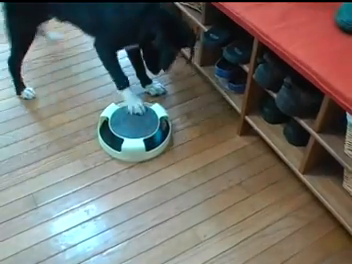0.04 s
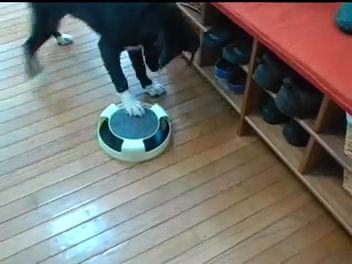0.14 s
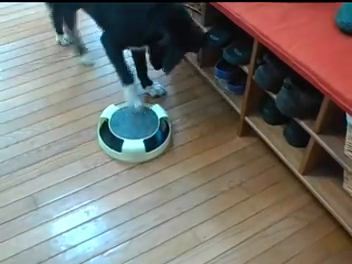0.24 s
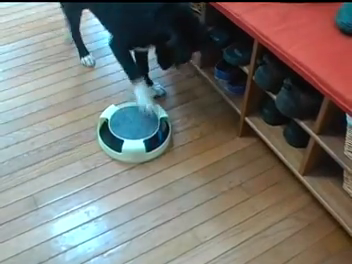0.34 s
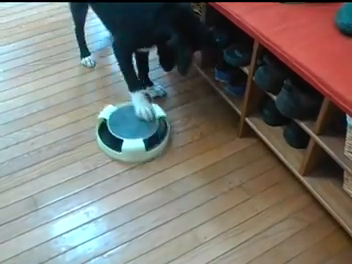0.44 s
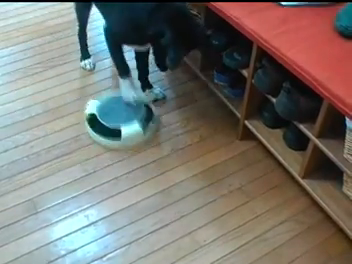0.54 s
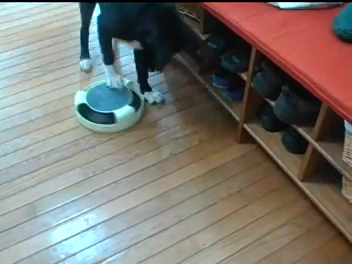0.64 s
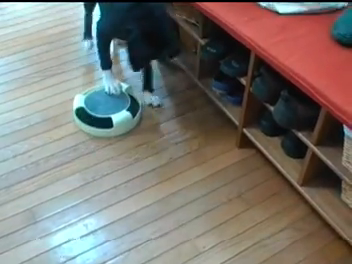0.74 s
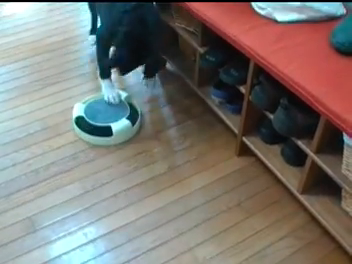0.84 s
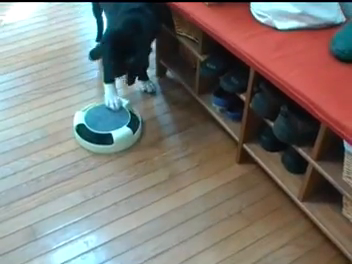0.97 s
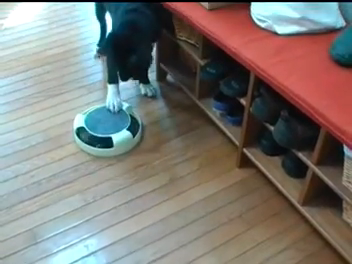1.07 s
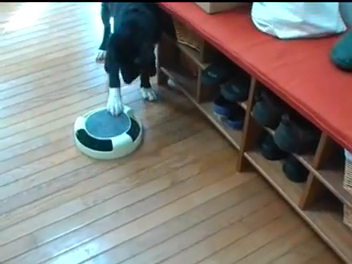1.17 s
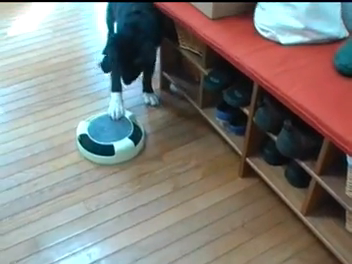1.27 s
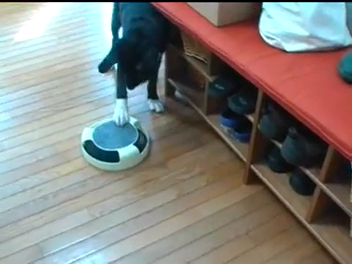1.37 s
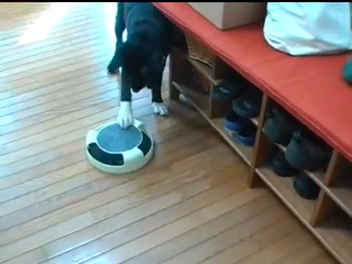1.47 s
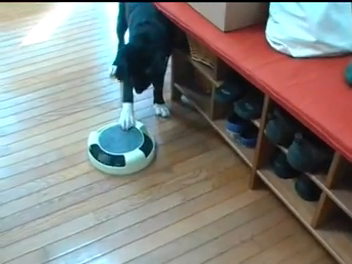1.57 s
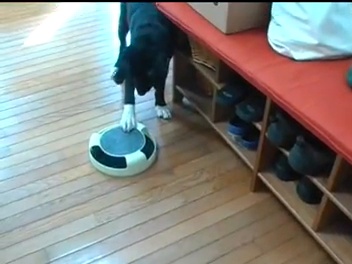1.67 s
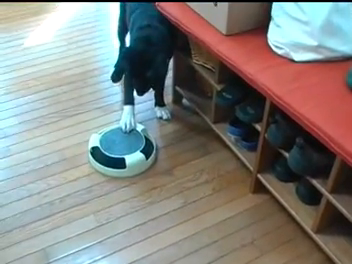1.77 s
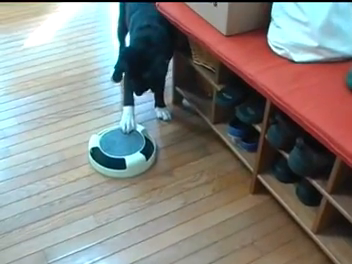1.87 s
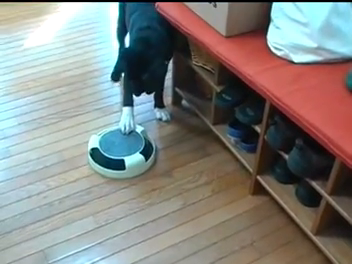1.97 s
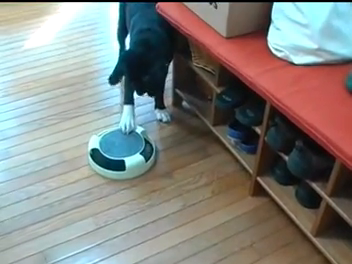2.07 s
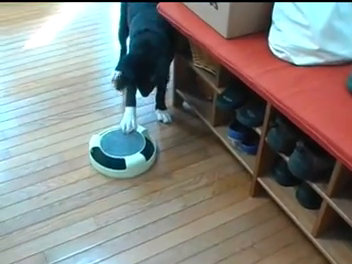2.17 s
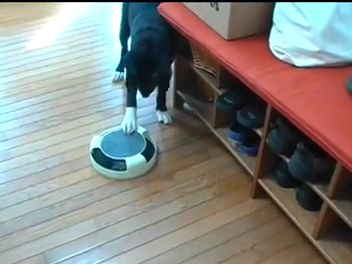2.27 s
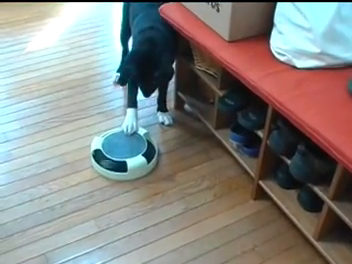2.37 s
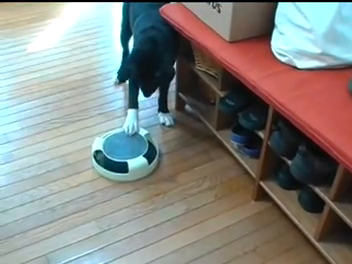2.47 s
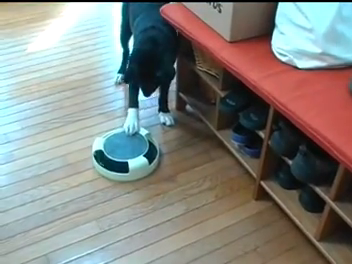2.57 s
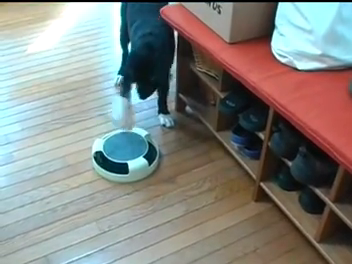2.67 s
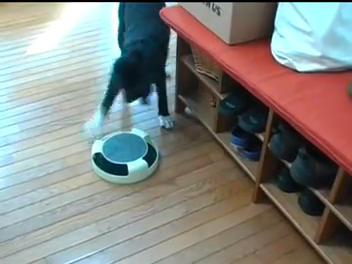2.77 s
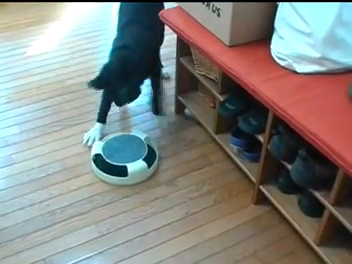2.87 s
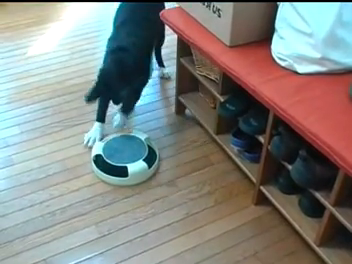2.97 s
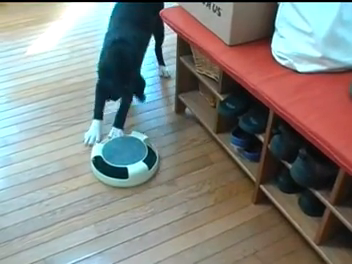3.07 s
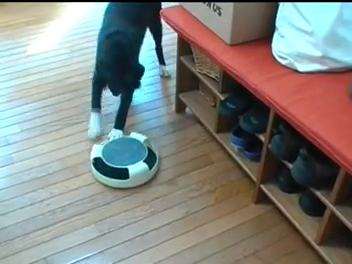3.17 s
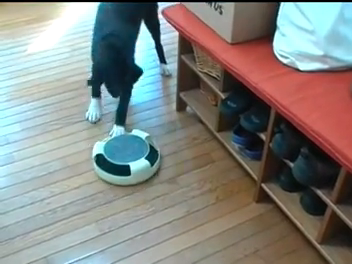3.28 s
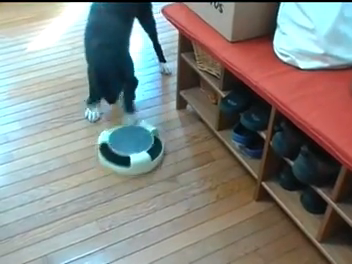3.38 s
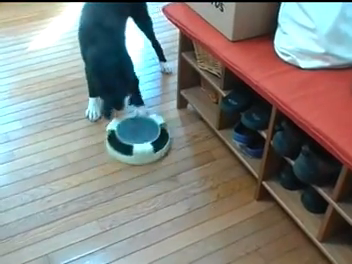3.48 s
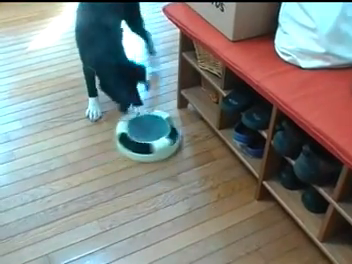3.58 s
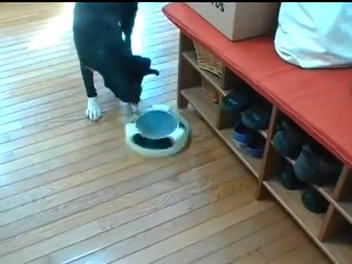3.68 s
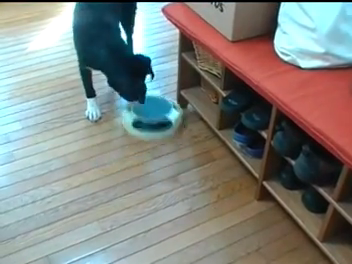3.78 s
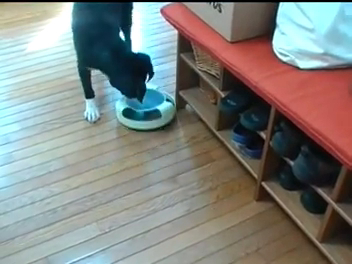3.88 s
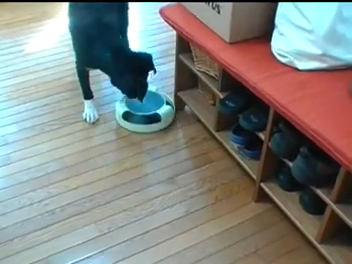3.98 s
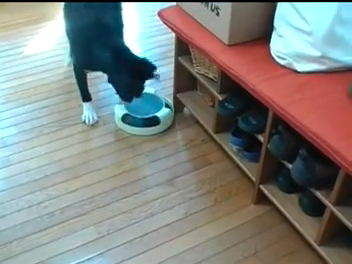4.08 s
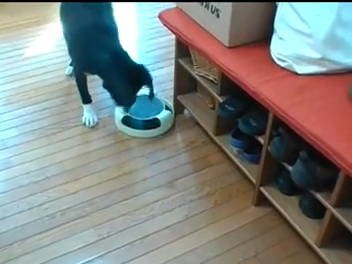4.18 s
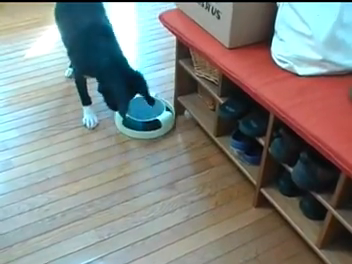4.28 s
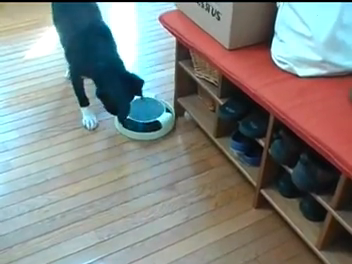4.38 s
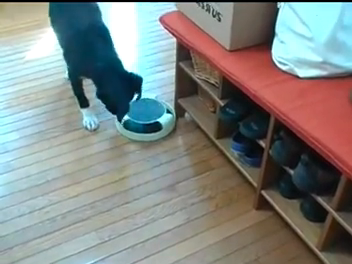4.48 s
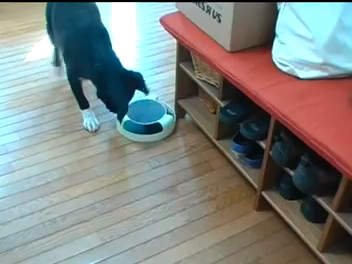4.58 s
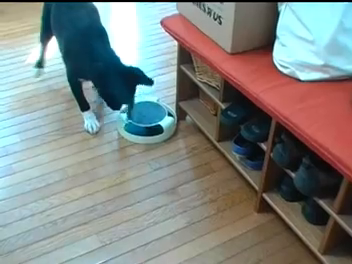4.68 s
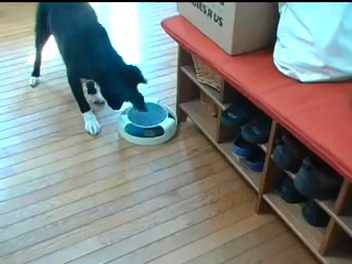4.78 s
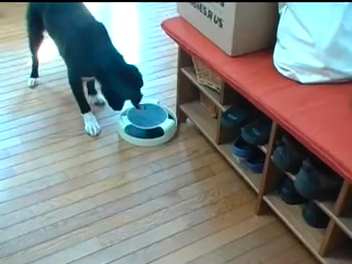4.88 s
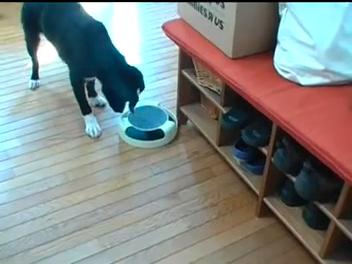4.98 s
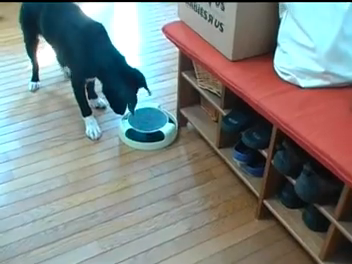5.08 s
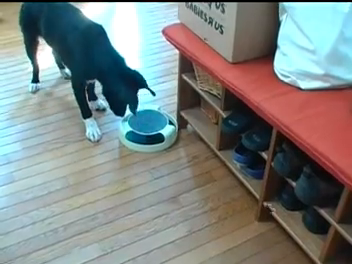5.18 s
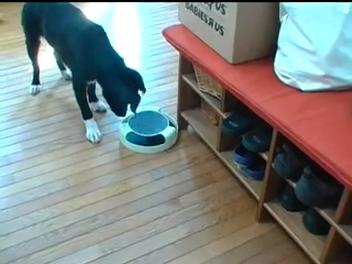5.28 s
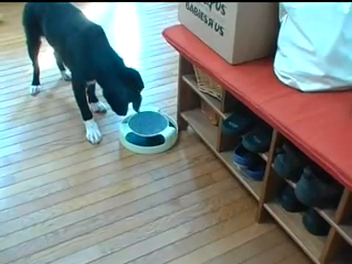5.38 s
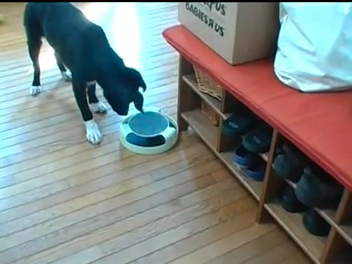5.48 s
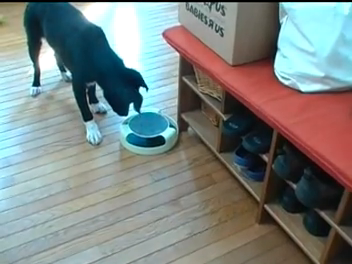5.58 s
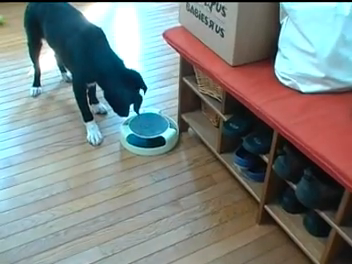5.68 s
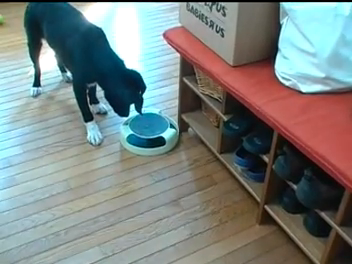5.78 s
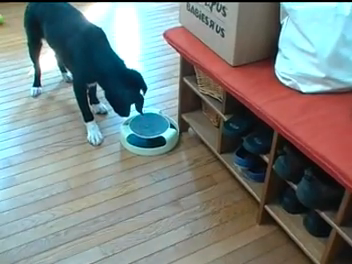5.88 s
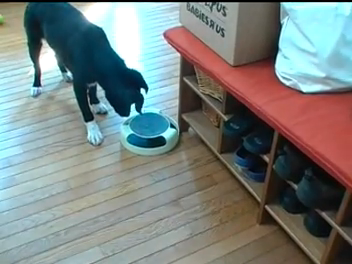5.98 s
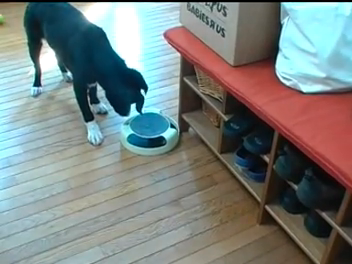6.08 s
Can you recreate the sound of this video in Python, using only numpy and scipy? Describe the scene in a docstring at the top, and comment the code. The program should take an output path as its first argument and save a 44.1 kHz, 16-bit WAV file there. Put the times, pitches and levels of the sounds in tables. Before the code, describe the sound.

A dog plays with a hollow plastic toy on a hardwood floor, heard from nearby in a quiet, fairly live room. Soft air noise and a faint low appliance hum run throughout. Right at the start a paw lands with a brief scrape. Around 0.5 seconds the toy skids and rocks on its rim with a hollow clatter, followed by claw ticks near 0.9 seconds. A lull follows, with two soft nudges at about 1.1 and 2.1 seconds. From 2.7 seconds paws tap the boards again, and the toy scrapes and knocks at 3.3 seconds. A swelling skid ends in a loud knock against a bench near 3.8 seconds. Claws and teeth click sharply on the shell with another knock around 4.3 seconds. The last faint ticks come near 4.7 seconds, leaving only the background until about 6 seconds.

```python
"""A dog paws and noses a round hollow plastic toy over hardwood in a quiet, fairly live room.
Faint appliance hum and air noise run throughout. First second: paws land on the boards, the toy skids
and rocks on its rim, claws and teeth tick on its shell. A lull follows, with two soft nudges.
From 2.7 s: more paws, then harder skids and knocks as the toy rocks and hits a shoe bench.
The last ticks come near 4.7 s and leave only the background."""
import sys
import numpy as np
from scipy import signal
from scipy.fft import rfft, irfft
from scipy.io import wavfile
from scipy.ndimage import uniform_filter1d

SR = 44100
rng = np.random.default_rng(int(sys.argv[2]) if len(sys.argv) > 2 else 0)


def wrap_up_sound(samples):
    """Save the sound to the file named by the first command line argument, as 16-bit audio."""
    columns = np.atleast_2d(samples).T
    # keep every value between -1 and 1, then stretch to whole-number steps
    tamed = np.clip(columns, -1, 1)
    steps = np.round(tamed * 32767).astype(np.int16)
    wavfile.write(sys.argv[1], SR, steps)


N = 270774
TIME_S = np.arange(N) / SR

# Paws landing. Each row: start in seconds, relative level in dB, weight (low bands) in dB,
# hardness (top band) in dB, ring of the touched spot in Hz, rattle decay in seconds.
PAW_FALLS = [(0.0615, -41.5, -4, 2.5, 1350, 0.0029), (0.231, -62.5, 7, -9, 700, 0.011),
             (2.7805, -42, 5, -13.5, 1330, 0.0045), (2.787, -63, 19, -17, 100, 0.0037),
             (2.9965, -44, -10, -9, 3600, 0.0022), (3.0085, -38.5, -4.5, -7.5, 3250, 0.003),
             (3.125, -48, -5, -13, 2000, 0.01)]
# Toy struck, tipping, dropping on its rim. Each row: as in PAW_FALLS.
TOY_KNOCKS = [(0.3645, -57, 11, -40, 870, 0.0022), (0.476, -36.5, -9, -31, 880, 0.0073),
              (0.54, -34.5, -21, -8, 2720, 0.015), (0.582, -37.5, -4, -1, 2070, 0.0069),
              (3.295, -38.5, -2, -10, 930, 0.0036), (3.338, -39, -4.5, -24, 920, 0.0016),
              (3.569, -59, 8.5, -14, 3200, 0.0092), (3.774, -32.5, 6, -7, 2500, 0.0038),
              (3.78, -48, 15.5, 7.5, 690, 0.0085), (3.795, -32.5, -5.5, -5.5, 1180, 0.00092),
              (3.906, -48.5, 10, -25, 1410, 0.0075), (4.3348, -33, -3.5, -6, 1240, 0.002),
              (4.344, -40.5, 0.5, -11, 425, 0.0034)]
# Claws and teeth on the shell. Each row: as in PAW_FALLS.
SHELL_TICKS = [(0.371, -59.5, -39, 1.5, 4500, 0.0022), (0.556, -39.5, -31, -11, 2980, 0.0025),
               (0.57, -46.5, -6, 0.5, 6300, .0011), (0.86, -48, -9.5, -7.5, 1520, 0.00084),
               (0.88, -49.5, -10, -2.5, 3280, 0.0063), (1.102, -68.5, 6, -10, 2830, 0.0014),
               (2.106, -62.5, 6, -0.5, 2900, .006), (4.2212, -36, -16, -9, 1590, 0.0027),
               (4.2395, -47, -4.5, -6, 3450, 0.0014), (4.2782, -41, -2, -1.5, 4770, 0.0014),
               (4.3155, -30.5, -8, -7.5, 3040, 0.0061), (4.673, -63, 4, 4.5, 1810, 0.00094),
               (4.688, -55.5, -6.5, -4, 4280, 0.012)]
# Bands of a contact. Each row: centre in Hz, width in Hz.
CONTACT_BANDS = [(220, 770), (800, 1690), (2800, 4370), (6500, 3100)]
# Pushes on the toy. Each row: start in seconds, length in seconds, relative starting level in dB,
# swell over the push in dB, treble lift in dB.
TOY_PUSHES = [(0.092, 0.13, -49, -7, -20), (0.423, 0.1, -45.5, -7, 0.5), (0.489, 0.11, -34.5, -7.5, 5),
              (1.062, 0.042, -60.5, -2, 5), (2.059, 0.054, -60, 1, 4), (2.69, 0.18, -65, -6, -10),
              (3.266, 0.17, -49, 3, 7.5), (3.572, 0.189, -53.5, 18, 6.5), (3.885, 0.26, -74, -15, -5),
              (4.259, 0.008, -43.5, 1, -10), (4.491, 0.013, -50.5, 4, -5)]
# Plastic rubbing on varnished wood. Each row: frequency in Hz, relative density in dB.
FRICTION_SPECTRUM = [(100, -27), (200, -23), (350, -7), (550, -5.5), (800, 3.5), (1500, 1.5), (3000, 1),
                     (6300, -9), (9000, -18), (13000, -32.5)]
# Steady air noise. Each row: frequency in Hz, relative density in dB.
AIR_SPECTRUM = [(25, -21), (70, -18.5), (110, -19), (150, -6.5), (180, -9.5), (260, -4), (410, -3.5),
                (625, -6), (1000, -10), (2000, -16), (3600, -20.5), (7000, -23.5), (11400, -27),
                (12200, -33), (12700, -57)]
# Floorboard modes. Each row: frequency in Hz, width in Hz, gain over the plain contact in dB.
BOARD_MODES = [(126, 65, 15), (273, 110, 6), (363, 11, -6)]
# Modes of the toy's shell. Each row: as in BOARD_MODES.
SHELL_MODES = [(124.4, 17.5, 10), (220, 7, -7), (363, 20, -2), (649, 15, 1.5), (840, 17, -14),
               (1184, 14, -1), (1460, 50, -16), (1702, 6.9, 7), (1943, 43, -14), (2603, 34, 0),
               (3370, 920, -5), (4700, 18, -27), (6350, 180, -16)]
# First reflections off bench and walls. Each row: delay in seconds, gain in dB.
EARLY_ECHOES = [(0.0097, -20), (0.0183, -22.5)]
# Room tail. Each row: frequency in Hz, level over direct in dB, T60 in seconds, side over mid in dB.
ROOM_TAIL = [(70, -11.5, 0.3, -33), (144, -7.5, 0.42, -39), (378, 5.5, 0.48, -35), (800, -5.5, 0.53, -49),
             (2000, -2.5, 0.42, -15.5), (4000, -4, 0.44, -13.5), (7160, -3, 0.44, -14),
             (12500, 3, 0.27, -6.5)]


def from_db(db):
    return 10 ** (np.asarray(db) / 20)


def unit_rms(x):
    return x / np.sqrt(np.mean(x ** 2) + 1e-20)


def bins_hz(size):
    return np.fft.rfftfreq(size, 1 / SR)


def at_hz(table, hz, column=1):
    """One table column, interpolated over log frequency."""
    table = np.array(table)
    return np.interp(np.log(np.maximum(hz, 1)), np.log(table[:, 0]), table[:, column])


def minimum_phase(gain_db):
    """Causal frequency response with this gain."""
    cepstrum = irfft(np.log(from_db(gain_db)))
    half = len(cepstrum) // 2
    cepstrum[1:half] *= 2
    cepstrum[half + 1:] = 0
    return np.exp(rfft(cepstrum))


def coloured(x, spectrum):
    return irfft(rfft(x) * minimum_phase(at_hz(spectrum, bins_hz(N))), N)


def drift(rate_hz):
    """Smooth random wander, unit rms."""
    return unit_rms(irfft(rfft(rng.standard_normal(N)) / (1 + (bins_hz(N) / rate_hz) ** 2), N))


def background(air_db, hum_hz, hum_db, waver, waver_hz, hiss_db):
    """Air noise, a wavering appliance hum and each microphone's own hiss."""
    air = from_db(air_db) * unit_rms(coloured(rng.standard_normal(N), AIR_SPECTRUM))
    hum_gain = from_db(hum_db) * np.sqrt(2) * (1 + waver * drift(waver_hz))
    hum = hum_gain * np.sin(2 * np.pi * hum_hz * TIME_S + waver * drift(waver_hz))
    hiss = irfft(rfft(rng.standard_normal((2, N))) * (bins_hz(N) < 12200), N)
    return air + hum + from_db(hiss_db) * hiss


def with_echo(table, echo_s=0.0095, echo_db=-11, echo_decay_s=0.0061):
    """Each contact, then its early echo 9.5 ms later: weaker, duller, bass-heavy."""
    echo_colour_db = [9.5, 3, 0, -12.5]
    for start_s, level_db, weight_db, hardness_db, ring_hz, rattle_s in table:
        band_db = level_db + np.array([weight_db, weight_db, 0, hardness_db])
        yield start_s, band_db, ring_hz, rattle_s
        yield start_s + echo_s, band_db + echo_db + echo_colour_db, ring_hz, echo_decay_s


def contacts(table, snap, rise_s, thump_db, ring_db, ring_q, bass_hz, top_hz, size=4096):
    """A snap amid a swelling, dying rattle of tiny rebounds; the touched spot rings briefly."""
    out = np.zeros(N + size)
    t, hz = np.arange(size) / SR, bins_hz(size) + 1
    centre_hz, width_hz = np.transpose(CONTACT_BANDS)
    rolloff_db = -10 * np.log10((1 + (bass_hz / hz) ** 10) * (1 + (hz / top_hz) ** 10))
    for start_s, band_db, ring_hz, decay_s in with_echo(table):
        force = rng.standard_normal(size) * np.exp(-t / decay_s) * (1 - np.exp(-t / rise_s))
        force /= np.linalg.norm(force)
        force[int(rise_s * SR / 2)] -= snap
        spectrum = rfft(force)
        flatten_db = -10 * np.log10(uniform_filter1d(np.abs(spectrum) ** 2, size=25))
        density_db = band_db + [thump_db, 0, 0, 0] - 10 * np.log10(width_hz / SR)
        ring = from_db(ring_db - 995 * decay_s)   # a longer rattle damps the ring
        spot_db = 10 * np.log10(1 + ring ** 2 / (1 + (ring_q * (hz / ring_hz - ring_hz / hz)) ** 2))
        gain_db = at_hz(np.c_[centre_hz, density_db], hz) + spot_db + rolloff_db + flatten_db
        start = int(start_s * SR)
        out[start:start + size] += irfft(spectrum * minimum_phase(gain_db))
    return out[:N]


def resonate(x, modes):
    """A body passes each contact on and rings in its modes."""
    out = x.copy()
    for hz, width_hz, db in modes:
        r = np.exp(-np.pi * width_hz / SR)
        poles = [1, -2 * r * np.cos(2 * np.pi * hz / SR), r * r]
        out += from_db(db) * signal.lfilter([(1 - r * r) / 2, 0, (r * r - 1) / 2], poles, x + 1e-18)
    return out


def paw_falls():
    """Paws and claws land on the boards: slow rise, small snap."""
    return from_db(23.5) * contacts(PAW_FALLS, snap=0.12, rise_s=0.00298, thump_db=-16,
                                    ring_db=9, ring_q=5, bass_hz=96, top_hz=6600)


def push_gain(start_s, length_s, level_db, swell_db, loosen_db_per_s=553, stop_db_per_s=380):
    """The toy breaks loose, gains or loses speed, then friction stops it."""
    t = TIME_S - start_s
    edges_db = loosen_db_per_s * np.minimum(t, 0) + stop_db_per_s * np.minimum(length_s - t, 0)
    return from_db(level_db + swell_db * np.clip(t / length_s, 0, 1) + np.maximum(edges_db, -200))


def toy_skids(slips_per_s, slip_spread_db, judder_db, judder_hz):
    """The rim sticks and slips: dense uneven clicks that surge as the toy judders."""
    slips = (rng.random(N) < slips_per_s / SR) * rng.choice([-1, 1], N)
    slip_db = slip_spread_db * np.minimum(rng.exponential(1, N), 4) + judder_db * drift(judder_hz)
    friction = unit_rms(coloured(slips * from_db(slip_db), FRICTION_SPECTRUM))
    treble = signal.sosfilt(signal.butter(1, [4800, 8500], "band", fs=SR, output="sos"), friction)
    sliding = sum(push_gain(*push) * (friction + (from_db(lift_db) - 1) * treble)
                  for *push, lift_db in TOY_PUSHES)
    low_cut = signal.butter(4, 130, "high", fs=SR, output="sos")   # a light toy radiates little bass
    return from_db(-4) * signal.sosfilt(low_cut, sliding)


def toy_knocks():
    """The toy is struck, tips and drops back on its rim: fast rise, more thump."""
    return from_db(24.5) * contacts(TOY_KNOCKS, snap=0.21, rise_s=0.00062, thump_db=-11.5,
                                    ring_db=10.5, ring_q=6.1, bass_hz=147, top_hz=6490)


def shell_ticks():
    """Claws and teeth catch on the hard shell: little bass."""
    return from_db(24.5) * contacts(SHELL_TICKS, snap=0.21, rise_s=0.001, thump_db=-13.5,
                                    ring_db=10.5, ring_q=7.2, bass_hz=230, top_hz=7000)


def room_response(build_s, lumpy_db, merge_s, size):
    """Direct sound, two early echoes and lumpy reflections merging into a smooth stereo tail."""
    t, hz = TIME_S[:size], bins_hz(size)
    lumps = from_db(lumpy_db * np.exp(-t / merge_s) * rng.standard_normal(size))
    lumps /= np.sqrt(uniform_filter1d(lumps ** 2, size=400))
    white = rfft(rng.standard_normal((2, size)) * lumps)
    edges_hz = np.geomspace(50, 16000, 15)
    tail = np.zeros((2, size))
    for low, high in zip(edges_hz, edges_hz[1:]):
        level_db, t60_s, side_db = [at_hz(ROOM_TAIL, np.sqrt(low * high), k) for k in (1, 2, 3)]
        band = irfft(white * ((hz >= low) & (hz < high)))
        band *= from_db(-60 * t / t60_s) * (1 - np.exp(-(t / build_s) ** 2))
        band *= np.sqrt(2 * (high - low) / SR) / np.linalg.norm(band, axis=1, keepdims=True)
        tail += band * from_db([[level_db], [level_db + side_db]])
    mid, side = tail
    response = np.array([mid + side, mid - side])
    response[:, 0] += 1
    for delay_s, db in EARLY_ECHOES:
        response[:, int(delay_s * SR)] += from_db(db)
    return response


def room(x, patterns=5, stretch_samples=700):
    """Dog and toy keep moving, so short stretches of sound cycle through reflection patterns."""
    pattern = (np.arange(N) // stretch_samples) % patterns
    out = 0
    for k in range(patterns):
        share = uniform_filter1d((pattern == k) * 1., size=200)
        response = room_response(build_s=0.00087, lumpy_db=5, merge_s=0.072, size=32768)
        out = out + signal.fftconvolve((x * share)[None], response, axes=1)[:, :N]
    return out


def scene():
    """Paws sound through the boards, the rest through the toy's shell; both fill the room."""
    paws, knocks, ticks = paw_falls(), toy_knocks(), shell_ticks()
    skids = toy_skids(slips_per_s=2600, slip_spread_db=2, judder_db=2.6, judder_hz=48.6)
    play = room(resonate(paws, BOARD_MODES) + resonate(skids + knocks + ticks, SHELL_MODES))
    steady = background(air_db=-64, hum_hz=147.5, hum_db=-74.5, waver=0.19, waver_hz=4.8, hiss_db=-73.5)
    return play + steady


def record(dry):
    """Sound reaches the left microphone slightly later and weaker; the top is cut."""
    left_lag_s, left_db, cutoff_hz = 2e-5, -0.1, 12500
    delay = np.exp(-2j * np.pi * bins_hz(N) * left_lag_s)
    left = from_db(left_db) * irfft(rfft(dry[0]) * delay, N)
    top_cut = signal.ellip(8, 0.1, 70, cutoff_hz, fs=SR, output="sos")
    return signal.sosfilt(top_cut, np.array([left, dry[1]]))


dry = scene()
out = record(dry)
wrap_up_sound(out)
```